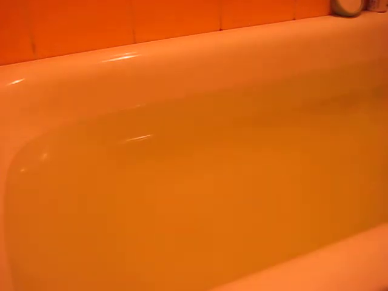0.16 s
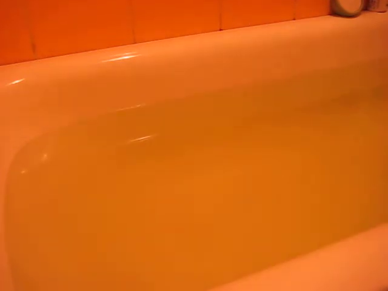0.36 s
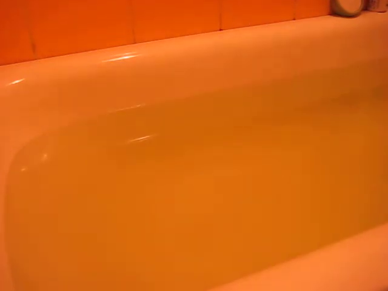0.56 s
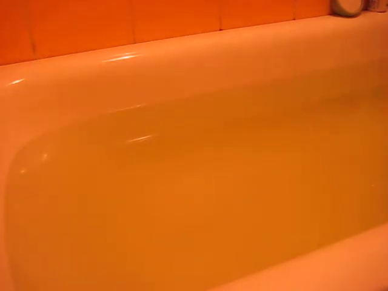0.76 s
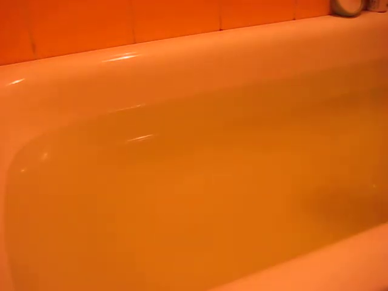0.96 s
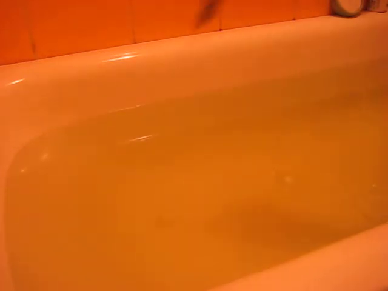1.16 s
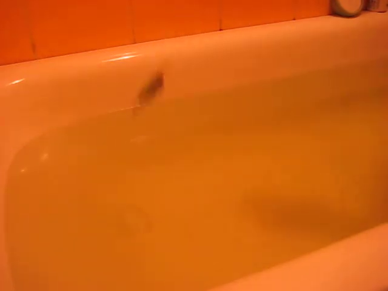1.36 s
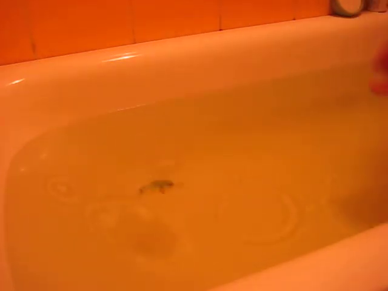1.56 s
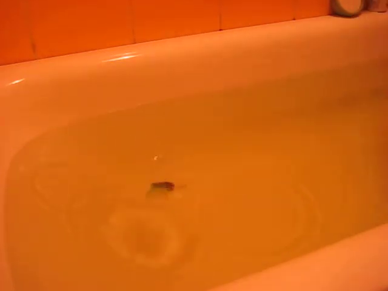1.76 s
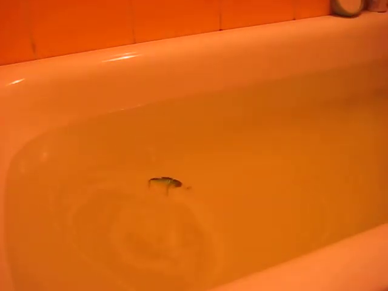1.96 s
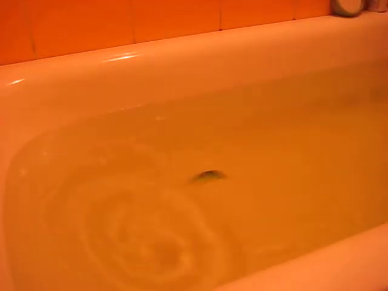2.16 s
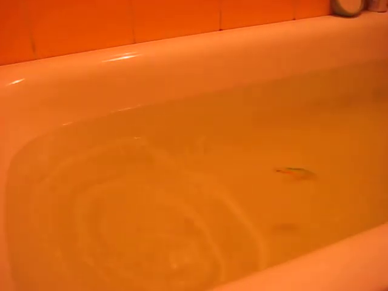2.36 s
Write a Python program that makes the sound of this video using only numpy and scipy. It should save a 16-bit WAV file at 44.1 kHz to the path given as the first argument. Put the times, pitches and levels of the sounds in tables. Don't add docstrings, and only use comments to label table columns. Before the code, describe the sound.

Crisp small splashes and bubble plips in a tub, first a dripping burst, then near quiet with a soft swish, a crackling drop-in splash and a gentler twitch of water, heard close over microphone hiss in a bathroom.

```python
import sys
import numpy as np
from scipy import signal
from scipy.fft import rfft, irfft, next_fast_len
from scipy.io import wavfile

SR = 44100
rng = np.random.default_rng(int(sys.argv[2]) if len(sys.argv) > 2 else 0)


def invert_db(x):
    u = np.asarray(x, float) / 20
    return 10 ** u


def wav_out(sig):
    wavfile.write(sys.argv[1], SR, np.round(np.clip(np.atleast_2d(sig).T, -1, 1) * 32767).astype(np.int16))


N = 105840

LOW_CUT_HZ, TOP_HZ = 963, 15750


def unit(x):
    return x / np.sqrt(np.mean(x ** 2) + 1e-20)


def along(points, hz):
    point_hz, value = np.transpose(points)
    return np.interp(np.log(hz + 1), np.log(point_hz + 1), value)


def filtered(x, response):
    size = next_fast_len(x.shape[-1] + 8192)
    spectrum = rfft(x, size) * response(np.fft.rfftfreq(size, 1 / SR))
    return irfft(spectrum, size)[..., :x.shape[-1]]


def band(size, centre_hz, octaves):
    def bell(hz):
        return np.exp(-(np.log2((hz + 1) / centre_hz) / octaves) ** 2 / 4)
    return unit(filtered(rng.standard_normal(size), bell))


def add(out, start_s, x):
    part = out[round(start_s * SR):][:len(x)]
    part += x[:len(part)]


def ping(pitch_hz, life_cycles, t):
    rise_per_cycle, soft_start = 0.004, 0.18
    cycles = pitch_hz * t
    swell = (1 - np.exp(-cycles / (0.12 + soft_start * life_cycles))) ** 2
    phase = 2 * np.pi * cycles * (1 + rise_per_cycle * np.minimum(cycles, 30) / 2)
    return 1.442 * np.sin(phase) * np.exp(-cycles / life_cycles) * swell


# hz, t60_s
TILE_RING = [(500, 0.7), (1500, 0.35), (3000, 0.32), (6000, 0.3), (12000, 0.23)]


def in_bathroom(x, echo_db):
    tiles_db, tub_db, tub_t60_s, first_echo_s = 1, -5, 0.05, 0.003
    size = SR // 2
    hz, t, z = signal.stft(rng.standard_normal(size), SR, nperseg=256)
    decay = invert_db(-60 * t / along(TILE_RING, hz)[:, None])
    tiles = signal.istft(z * decay, SR, nperseg=256)[1][:size]
    tub = rng.standard_normal(size) ** 3
    tub = tub * invert_db(-60 * np.arange(size) / SR / tub_t60_s)
    echo = invert_db(tiles_db) * tiles / np.linalg.norm(tiles) + invert_db(tub_db) * tub / np.linalg.norm(tub)
    gap = np.zeros(round(first_echo_s * SR))
    return signal.fftconvolve(x, np.r_[1, gap, invert_db(echo_db) * echo])


def pings(events):
    out, t = np.zeros(N), np.arange(SR // 20) / SR
    for start_s, peak_db, pitch_hz, life_cycles, echo_db in events:
        sound = ping(pitch_hz, max(life_cycles, 1), t)
        add(out, start_s, invert_db(peak_db) * in_bathroom(sound, echo_db))
    return out


# start_s, peak_db, pitch_hz, life_cycles, echo_db
LARGE_BUBBLES = [(0.242, -42, 1600, 4.4, 3.5), (0.263, -27.5, 2210, 3, 12), (0.37, -25, 1916, 2.3, -0.5),
                 (0.377, -23.5, 1675, 2.6, -2.5), (.394, -31.5, 1610, 5, 1.5), (1.456, -21, 1590, 2, 6),
                 (1.456, -31.5, 1210, 5.8, -2), (1.522, -21, 1090, 5.8, -7), (1.523, -20, 2260, 5.2, -8),
                 (2.099, -24.5, 960, 0.82, 6.5), (2.137, -24.5, 1416, 5.4, -3),
                 (2.146, -25.5, 1135, 4.6, -5), (2.160, -25, 1430, 4.8, -6), (2.260, -29.5, 2010, 2.7, -2),
                 (2.268, -30, 1316, 7.2, -2.5), (2.292, -34.5, 1455, 4.3, 1)]
MEDIUM_BUBBLES = [(0.2597, -8.5, 2896, 6.3, -7.5), (0.264, -7, 2813, 5.3, -5.5),
                  (0.2734, -11.5, 2880, 6.2, -4.5), (0.2875, -10.5, 2940, 6.4, -2),
                  (.3130, -16.5, 3000, 6.7, -15), (1.706, -41, 3400, 8, -7), (2.0842, -30.5, 3230, 5, 4.5),
                  (2.1359, -21, 3600, 3.2, -4), (2.2588, -38, 3370, 5.1, 6.5), (2.293, -48, 3280, 8, 1),
                  (2.362, -45, 3440, 8.4, 0), (2.3807, -34, 2460, 5.3, 6.5)]
SMALL_BUBBLES = [(0.2359, -29, 5300, 12, -6), (0.2367, -20, 6070, 10, -18), (0.2587, -22, 5900, 9, -1),
                 (0.3699, -26, 5700, 20, -8), (0.3863, -25, 8240, 16.5, -5), (0.506, -30.5, 9450, 14, -2),
                 (0.5365, -28.5, 7420, 19, -6), (0.58, -25, 13000, 9, 5), (0.6394, -43, 11500, 14, 4),
                 (0.6537, -35, 10800, 12, 3), (1.7609, -43, 5100, 12, -0.5), (1.8382, -37, 5100, 11.4, -10),
                 (2.0704, -30, 5140, 16, -13), (2.3307, -38, 8450, 14, 0), (2.3806, -29, 5010, 17, -6)]


def bubbles():
    return pings(LARGE_BUBBLES + MEDIUM_BUBBLES + SMALL_BUBBLES)


# start_s, peak_db, pitch_hz, life_cycles,
# echo_db
SURFACE_CRACKS = [(0.2313, -17, 11300, 1.7, 4.5), (0.234, -15, 6100, 1.6, 2.5),
                  (0.2375, -18, 6200, 1.8, -9), (0.2609, -4, 3670, 1.4, -1), (.2993, -2, 8850, 0.8, -5),
                  (1.4506, -18, 8100, 1.5, -13), (1.4534, -4.5, 3620, 3, -8), (1.457, -14, 6850, 0.85, -10),
                  (1.4820, -7.5, 3350, 2.1, -6), (1.4811, -14.5, 2304, 5.6, -9),
                  (1.4847, -9.5, 4000, 3.9, -29), (1.5026, 0.5, 3420, 0.93, -9),
                  (1.5032, -10, 2320, 2.6, -7), (1.5273, -10.5, 6100, 2, 3.5), (1.5270, -10.5, 3200, 2, -1),
                  (2.0635, -28, 7300, 1.7, -15), (2.064, -15, 4230, 1.9, -9),
                  (2.0666, -16.5, 3690, 2.4, -18), (2.115, -23, 1950, 1.7, -2),
                  (2.137, -20, 2200, 0.59, -0.5), (0.369, -28, 2980, 9, -1)]


def cracks():
    return pings(SURFACE_CRACKS)


def spray(centre_hz, octaves, size):
    drops_per_s, drop_cycles, scatter_db = 2500, 1.14, 1
    draw = rng.random((round(drops_per_s * size / SR), 3))
    scatter = np.log(draw[:, 1] / (1 - draw[:, 1])) / 1.97
    hz = np.clip(centre_hz * 2 ** (octaves * scatter), LOW_CUT_HZ, TOP_HZ)
    k = np.arange(128)
    drops = ping(hz[:, None], drop_cycles, k / SR) * invert_db(-scatter_db * np.log(draw[:, 2:]))
    at = (draw[:, :1] * size).astype(int) + k
    crackle = np.bincount(at.ravel(), drops.ravel(), size + 128)[:size]
    fizz = band(size, centre_hz, octaves / 0.83)
    return unit(1.47 * unit(crackle) + fizz)


# start_s, level_db, centre_hz, spread_octaves, t60_s
WATER_SLAPS = [(0.0976, -31, 3520, 1.38, 0.041), (0.2309, -27.5, 10100, 0.59, 0.039),
               (.370, -31, 2520, 0.73, 0.059), (0.5044, -33, 6700, 0.64, 0.025),
               (.745, -42, 10280, 0.91, 0.011), (1.003, -42, 8100, 0.55, 0.019),
               (1.446, -40.5, 8900, 0.9, 0.13), (1.4515, -17, 5000, 0.97, 0.048),
               (1.458, -31, 8000, 1.1, 0.017), (1.480, -25.5, 3700, 0.71, 0.053),
               (1.5023, -21, 5000, 0.93, 0.038), (1.5199, -32.5, 8300, 0.66, .06),
               (1.526, -15.5, 5000, 1.12, 0.013), (2.056, -42.5, 4060, 0.52, 0.041),
               (2.063, -26, 5130, 0.69, 0.042), (2.104, -30, 5800, 0.83, .02),
               (2.330, -50.5, 7950, 0.19, 0.25), (2.305, -46, 11900, .3, .006),
               (2.380, -34, 5800, 0.31, 0.14)]


def slaps():
    out, t = np.zeros(N), np.arange(SR // 10) / SR
    attack = 1 - np.exp(-t / 0.00019)
    for start_s, level_db, centre_hz, octaves, t60_s in WATER_SLAPS:
        burst = spray(centre_hz, octaves, len(t)) * invert_db(level_db - 60 * t / t60_s) * attack
        add(out, start_s, in_bathroom(burst, 0))
    return out


# start_s,
# peak_db, pitch_hz, life_cycles
NEAR_PINGS = [(0.1001, -21, 5000, 1.54), (.099, -32.5, 1280, 2), (.1003, -40, 8700, 6),
              (.1105, -34, 5200, 5.5), (0.279, -16, 3020, 7), (.2935, -14, 2950, 5),
              (0.2998, -13.5, 3100, 5.9), (.3195, -18, 3070, 4.9), (.324, -22.5, 3000, 6.3),
              (.3335, -24, 2970, 5), (.343, -25.5, 2970, 7), (.376, -24.5, 2990, 8),
              (0.3837, -24, 1950, 4.2), (.391, -31, 2100, 3), (0.398, -24.5, 2800, 8.1),
              (.5065, -37, 4650, 4.84), (.508, -32, 2970, 4), (0.542, -31, 7860, 12),
              (.644, -41, 11700, 16), (.659, -41, 11500, 20), (.668, -42, 11300, 14),
              (1.458, -4.5, 4800, 1), (1.466, -23, 2900, 4), (1.472, -23, 3400, 4),
              (1.4965, -23, 3520, 5), (1.511, -27, 2110, 4), (1.4833, -21, 2500, 3.3),
              (1.5212, -16, 2870, 5), (2.069, -25, 3480, 4), (2.075, -25, 2900, 3.3),
              (2.0855, -40, 7500, 25), (2.088, -30, 3000, 2), (2.151, -31, 1750, 2),
              (2.1363, -16, 3030, 1), (2.1455, -21, 1920, 2.6), (2.167, -31, 1440, 4.6),
              (2.185, -33, 1430, 4), (2.192, -37, 1450, 4.5), (2.2735, -39, 1330, 5.4),
              (2.282, -34, 1400, 3.7), (2.286, -38, 1350, 3.5), (2.303, -42, 1440, 6),
              (2.312, -33, 1460, 4), (2.3665, -45, 3620, 8), (2.382, -25, 6500, 10),
              (2.384, -38, 4070, 14)]


def near_pings():
    return pings([(*drip, -11.5) for drip in NEAR_PINGS])


# start_s, level_db
RAIN_BACK = [
    (0.2, -45.5),
    (0.34, -36.5),
    (0.41, -43.5),
    (0.532, -47.5),
    (0.66, -60),
]


def wash():
    start_s, level_db = np.transpose(RAIN_BACK)
    t = np.arange(start_s[0], start_s[-1], 1 / SR)
    patter = spray(5000, 0.75, len(t))
    patter = patter * invert_db(-3.5 + np.interp(t, start_s, level_db)) * signal.windows.tukey(len(t), 0.15)
    out = np.zeros(N)
    add(out, start_s[0], in_bathroom(patter, 0))
    return out


# hz, gain_db
HOUSING = [(1000, -3), (2000, 1.5), (3000, 0), (4500, 0.5), (6000, 0), (8500, 0), (11000, 3.5), (15500, -8)]


def through_housing(x):
    near = filtered(x, lambda hz: invert_db(along(HOUSING, hz)))
    return signal.sosfilt(signal.butter(6, LOW_CUT_HZ, "high", fs=SR, output="sos"), near)


def swish():
    peak_s, rise_s, level_db = 0.782, 0.07, -44.5
    t = np.arange(N) / SR - peak_s

    def swell(fall_s):
        return np.where(t < 0, np.exp(-(t / rise_s) ** 2), np.exp(-np.abs(t) / fall_s))
    bright = swell(0.048) * band(N, 5300, 0.51)
    dull = invert_db(-1.5) * swell(0.13) * band(N, 2620, 0.49)
    return invert_db(level_db) * (bright + dull)


def slosh():
    peak_s, length_s = 0.35, 0.37
    swell = np.exp(-((np.arange(N) / SR - peak_s) / length_s) ** 2)
    out = invert_db(-56.5) * swell * band(N, 497, 0.3)
    gulp = ping(690, 16, np.arange(SR // 8) / SR)
    add(out, 0.328, invert_db(-44.5) * gulp)
    return out


# hz, density_db per Hz
HISS_CURVE = [(410, -81), (700, -1), (2200, -3), (6500, -4.5), (10500, -9.5), (12500, -9.5), (14000, -3.5),
              (15500, -11)]
# hz, density_db per Hz
RUMBLE_CURVE = [(15, -38), (25, -8), (59, -4), (358, -7), (401, -4.5), (700, -10), (910, -42), (1540, -120)]
# pitch_hz, level_db rms
WHINES = [(15121, -69), (15150, -66), (7563, -69)]


def floor():
    hum_hz, hum_width_hz, steady_hum = 56, 11, 0.53
    t = np.arange(N) / SR
    hiss = filtered(rng.standard_normal(N), lambda hz: invert_db(along(HISS_CURVE, hz)) * (hz > 300))
    rumble = filtered(rng.standard_normal(N), lambda hz: invert_db(along(RUMBLE_CURVE, hz)))
    waver = filtered(rng.standard_normal(N), lambda hz: np.exp(-((hz - hum_hz) / hum_width_hz) ** 2))
    hum = unit(waver) + steady_hum * 2 * np.sin(2 * np.pi * hum_hz * t)
    out = invert_db(-49) * unit(hiss) + invert_db(-57) * unit(rumble) + invert_db(-65.5) * unit(hum)
    for pitch_hz, level_db in WHINES:
        out += np.sqrt(2) * invert_db(level_db) * np.sin(2 * np.pi * pitch_hz * t)
    return out


def scene():
    water = through_housing(bubbles() + cracks() + slaps() + near_pings() + wash())
    return (water + swish() + slosh() + floor())[None]


def roll_off(x):
    return signal.sosfilt(signal.butter(12, 16510, fs=SR, output="sos"), x)


def record(dry):
    mix = filtered(dry, lambda hz: np.where(hz < TOP_HZ, 1, invert_db(-40)))
    return roll_off(mix)


dry = scene()
out = record(dry)
wav_out(out)
```